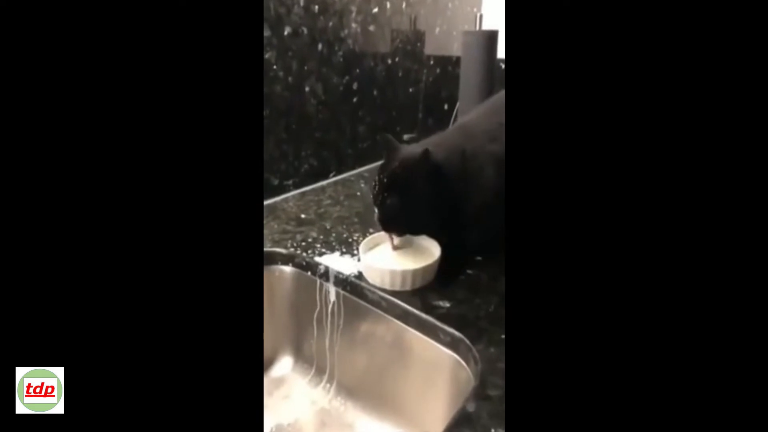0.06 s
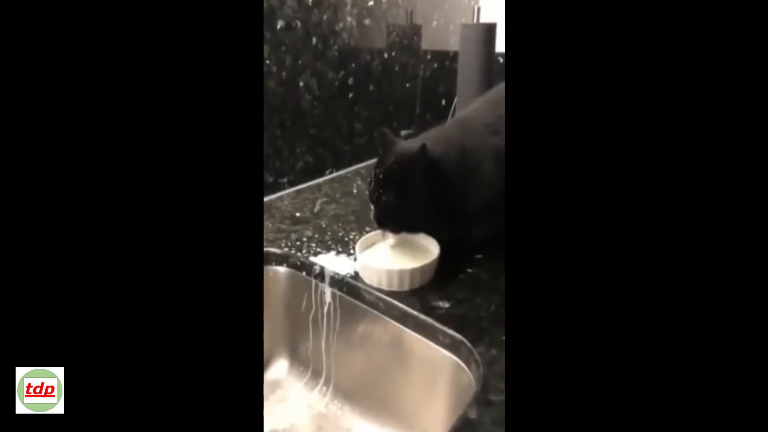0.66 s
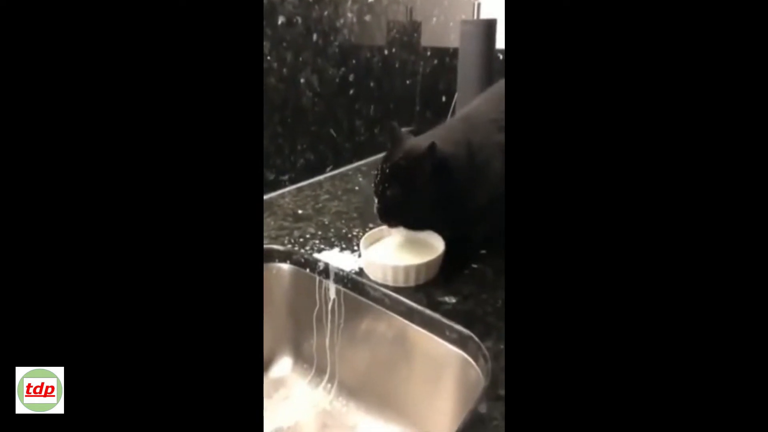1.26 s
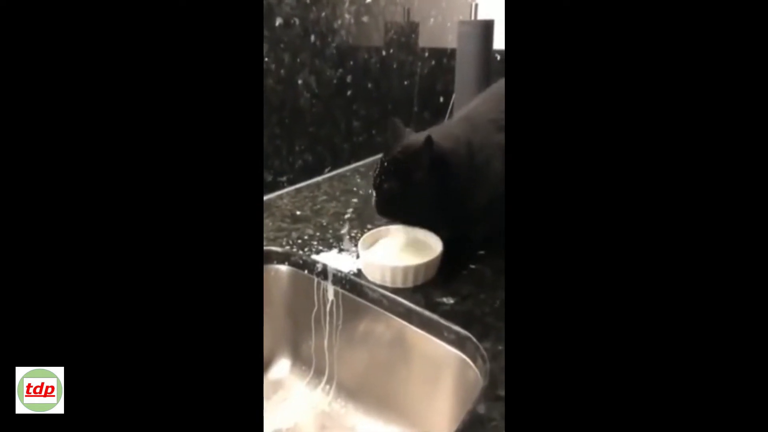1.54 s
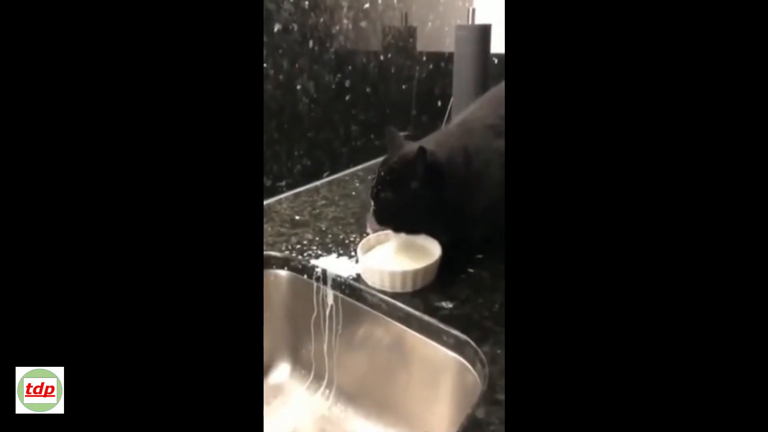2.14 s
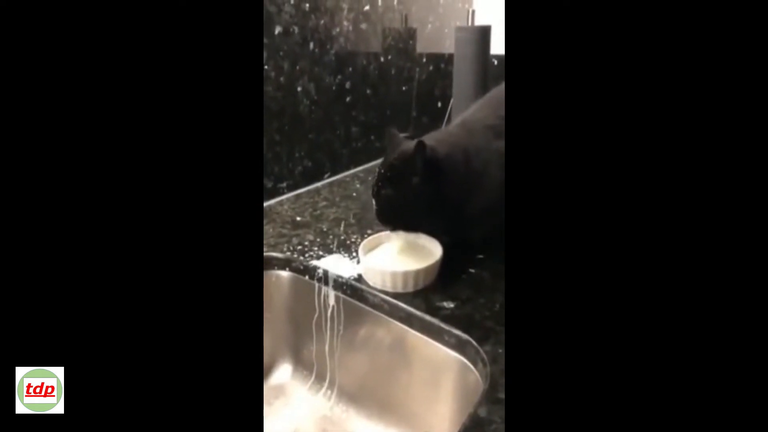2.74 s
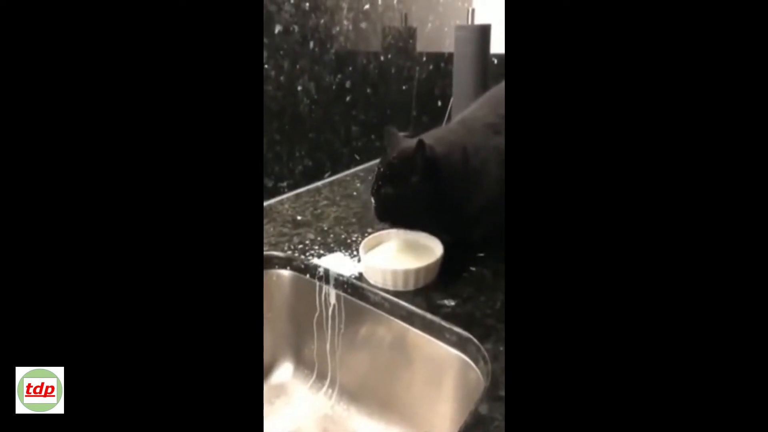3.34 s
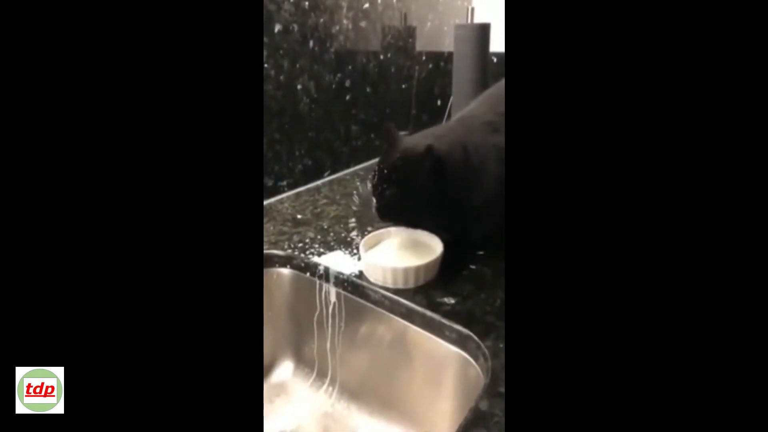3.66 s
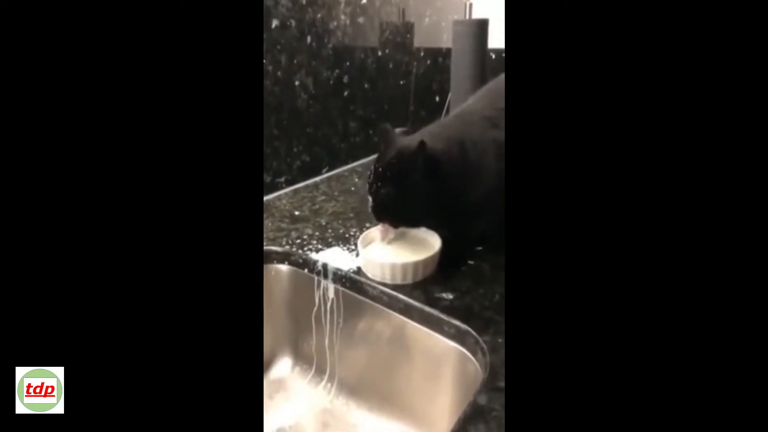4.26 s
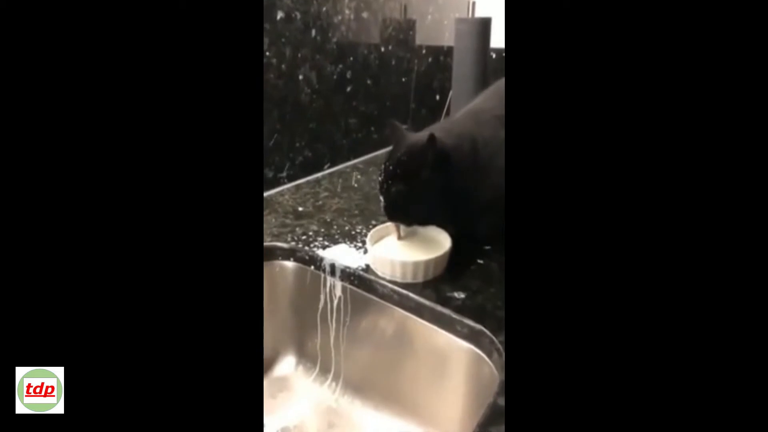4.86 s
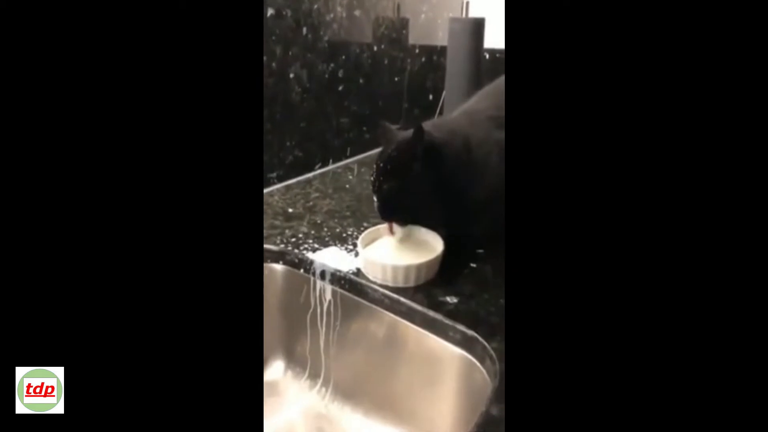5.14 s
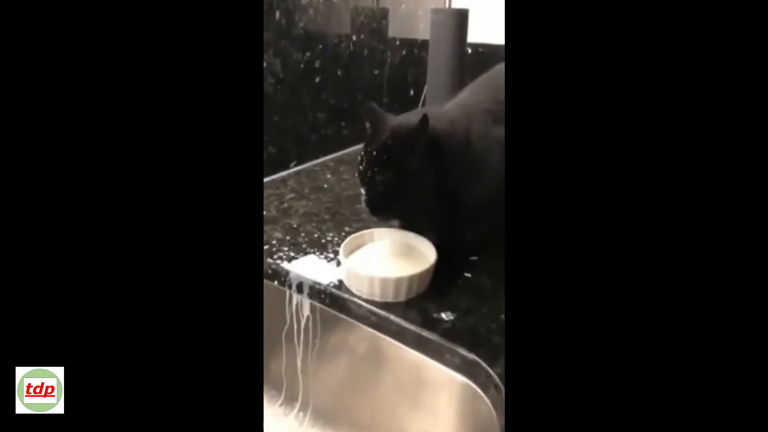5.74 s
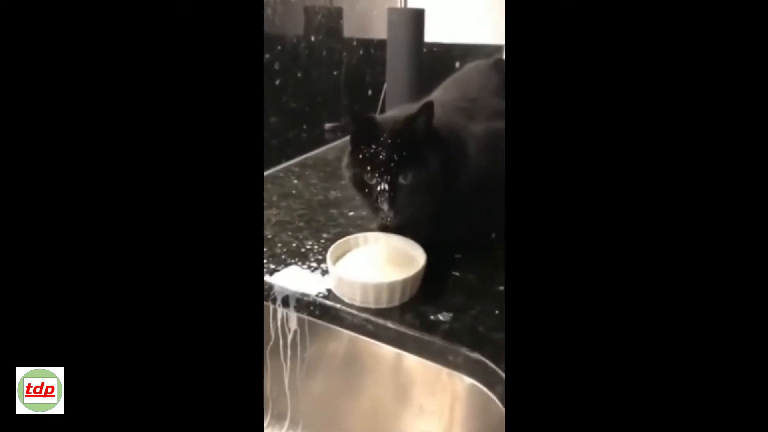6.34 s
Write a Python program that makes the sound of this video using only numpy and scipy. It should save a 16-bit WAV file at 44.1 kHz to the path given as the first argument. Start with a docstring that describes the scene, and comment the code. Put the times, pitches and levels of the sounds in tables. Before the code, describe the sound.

Close, steady lapping of a cat drinking from a bowl: soft squelches and crisp wet clicks over faint room hiss.

```python
"""A kitchen, close to the stone counter: just left of a stereo microphone, a cat laps milk from a small
ceramic bowl, about three laps a second. In every lap the wet tongue reaches out, dips and crackles;
then the mouth shuts with a gulp and a smack whose pitch rises as the cavity shrinks, until the lips
seal. Air pockets pop and saliva films snap. Bowl and kitchen ring briefly behind the direct sound;
a very low rumble and the faint hiss of room air lie underneath."""
import sys
import numpy as np
from scipy import signal
from scipy.fft import rfft, irfft, next_fast_len
from scipy.io import wavfile
from scipy.ndimage import uniform_filter1d

SR = 44100
rng = np.random.default_rng(int(sys.argv[2]) if len(sys.argv) > 2 else 0)


def wav_out(sig):
    """Save sig, one row per channel (or a flat mono array), as 16-bit PCM at SR to the path in sys.argv[1]."""
    wavfile.write(sys.argv[1], SR, np.round(np.clip(np.atleast_2d(sig).T, -1, 1) * 32767).astype(np.int16))


N = 282240
TIME = np.arange(N) / SR
GRAIN = TIME[:SR // 12]  # time within one short event
LEFT_RIGHT = np.array([[1], [-1]])  # sign of the side signal in each channel


def from_db(db):
    return 10 ** (np.asarray(db) / 20)


def rms_one(x):
    return x / np.sqrt(np.mean(x ** 2) + 1e-20)


def burst_one(x, size=132):
    """Scale a burst to rms 1 over its loudest `size` samples."""
    return x / np.sqrt(uniform_filter1d(x ** 2, size).max() + 1e-20)


def sustained(x, span_s=0.049):
    """Even out the level over a tongue stroke, leaving single grains uneven. Rms 1."""
    local_power = np.abs(uniform_filter1d(x ** 2, int(span_s * SR)))
    return rms_one(x / np.sqrt(local_power + .1 * np.mean(x ** 2)))


def add(out, s, sound):
    """Mix a sound in at time s."""
    at = int(np.clip(s * SR, 0, N - 1))
    out[at:at + len(sound)] += sound[:N - at]


def resonance(x, hz, width_hz):
    """Two-pole band-pass with gain 1 at its peak."""
    r = np.exp(-np.pi * width_hz / SR)
    feedback = [1, -2 * r * np.cos(2 * np.pi * hz / SR), r * r]
    return signal.lfilter(np.array([1, 0, -1]) * (1 - r * r) / 2, feedback, x + 1e-18)


def cut(x, hz, kind, order=2):
    """Butterworth high- or low-pass."""
    sections = signal.butter(order, min(hz, SR / 2 - 100), kind, fs=SR, output="sos")
    return signal.sosfilt(sections, x + 1e-18)


def colour(x, spectrum):
    """Minimum-phase filter through points of (frequency [Hz], gain [dB])."""
    size = next_fast_len(x.shape[-1] + len(GRAIN), True) * 2
    hz, db = np.transpose(spectrum)
    bin_hz = np.arange(size // 2 + 1) * SR / size
    log_gain = np.log(from_db(np.interp(np.log(bin_hz + 1), np.log(hz), db)))
    cepstrum = irfft(log_gain)[:size // 2]
    cepstrum[1:] *= 2
    return irfft(rfft(x, size) * np.exp(rfft(cepstrum, size)))[..., :x.shape[-1]]


def crackle(size, per_s, spread_db):
    """Random clicks of uneven strength."""
    strength = from_db(spread_db * np.minimum(rng.exponential(1, size), 4))
    return strength * rng.choice([-1, 1], size) * (rng.random(size) < per_s / SR)


# Room tone at the microphone: (frequency [Hz], gain [dB])
AIR_SPECTRUM = [(25, 10.5), (50, -13), (100, -20), (250, -27), (650, -38.5), (1400, -40), (3500, -48),
                (7000, -52), (15000, -58)]

def room_air(level_db=-55.5):
    """Still air hisses faintly all around the microphone."""
    mid, side = rng.standard_normal((2, N))
    air = colour(mid + side * LEFT_RIGHT, AIR_SPECTRUM)
    return from_db(level_db) * rms_one(cut(air, 37.5, "high"))


# Course of the rumble in the room: (time [s], level [dB])
RUMBLE_LEVELS = [(0, -36.5), (.3, -31), (.55, -51.5), (1.2, -41.5), (1.6, -36), (1.9, -47), (2.2, -32.5),
                 (4.8, -42), (5.25, -32), (5.6, -43.5)]

def rumble(hz=9.4, width_hz=3.7):
    """A slow sway below hearing, alike in both channels."""
    band = resonance(resonance(rng.standard_normal(N + SR), hz, width_hz), hz, width_hz)
    analytic = signal.hilbert(band)[SR:]
    envelope = np.abs(analytic)
    evened = analytic.real / (envelope + envelope.mean() / 2)
    level_db = np.interp(TIME, *np.transpose(RUMBLE_LEVELS))
    return from_db(level_db) * rms_one(cut(evened, 23.0, "low"))


# Licks round the lips between laps: (time [s], squelch level [dB], fizz level [dB])
LIP_LICKS = [(0.01, -54, -55.5), (0.166, -49, -52.5), (0.231, -55, -58), (0.477, -77, -62),
             (.53, -58.5, -65), (1.288, -53.5, -62), (2.02, -65, -64), (2.22, -61, -63),
             (2.647, -59.5, -61.5), (3.002, -55, -62), (3.32, -64, -60), (3.68, -65, -73),
             (4.118, -60.5, -56.5), (4.43, -56, -60), (4.78, -62.5, -65), (5.14, -55, -61),
             (5.852, -54.5, -61.5), (6.16, -64.5, -70)]
# Laps at the bowl, also played by the snaps, pops and smacks; delays count from the jaw shutting:
# (jaw shuts [s], reach gain [dB], squelch level [dB], fizz level [dB], thump level [dB],
#  cavity level [dB], spray level [dB], gulp level [dB], lip seal delay [s], lip seal level [dB],
#  film delay [s], film level [dB], film pitch [Hz])
MILK_LAPS = [(0.348, -12, -60, -55.5, -48.5, -61, -53.5, -42.5, 0.04, -44, 0.011, -42.5, 6100),
             (0.693, -6, -55, -49, -46, -54, -50, -51, 0.04, -53, 0.016, -33.5, 7900),
             (1.027, 2, -56.5, -55, -72, -54.5, -52, -54, 0.029, -41, 0.014, -36, 4370),
             (1.428, -6.5, -56.5, -51, -47.5, -50, -55, -40, 0.03, -36, 0.014, -42, 6460),
             (1.746, -2, -55.5, -55.5, -51, -54, -57.5, -48.5, 0.026, -36, 0.0094, -40, 6100),
             (2.139, -11, -54.5, -52, -41.5, -57, -57.5, -36.5, 0.041, -55.5, 0.015, -33, 4500),
             (2.455, 2.5, -55, -55.5, -47.5, -69, -48, -69, 0.024, -43.5, 0.024, -41, 6600),
             (2.842, -5, -54.5, -52.5, -41, -48.5, -53.5, -35.5, 0.032, -41, .012, -44.5, 4630),
             (3.168, -1.5, -54, -50, -48.5, -56, -53.5, -51, 0.026, -29.5, 0.02, -39, 6640),
             (3.552, -4, -53, -49, -47.5, -49, -65, -47.5, 0.046, -45.5, .013, -35.5, 5560),
             (3.884, -3, -50.5, -50, -54, -48.5, -49.5, -42.5, .027, -47.5, .02, -43, 4800),
             (4.279, 0.5, -53, -52.5, -42.5, -44.5, -48.5, -30, 0.035, -48.5, 0.017, -38, 5830),
             (4.606, 0, -49, -52, -59, -49, -45.5, -41, .031, -40, .009, -34, 5360),
             (5.003, -4, -50.5, -51, -36.5, -48, -50, -37, 0.039, -43, 0.022, -41, 7400),
             (5.328, -5, -47.5, -49.5, -48.7, -46, -48.5, -55, 0.028, -31.5, 0.0076, -40, 10700),
             (5.716, -3, -50, -48, -39.5, -49, -47, -57, 0.028, -37, 0.0055, -34, 7600),
             (6.038, 0, -49, -49.5, -43, -49.5, -49.5, -41.5, 0.028, -37.5, 0.015, -36.5, 6130),
             (6.378, -5, -53, -52.5, -44.5, -47, -56, -38.5, 0.034, -40, .0044, -43, 13700)]

def tongue_motion(reach_lead_s=0.1084, dip_lead_s=0.057, settle_lag_s=.05, rest_db=(-71, -73.5)):
    """Squelch and fizz levels in dB: the tongue licks, reaches, dips and settles over a faint wet rest."""
    moves = [(swell(s, rise_s=.02, fall_s=.028), squelch, fizz) for s, squelch, fizz in LIP_LICKS]
    for s, reach_db, squelch, fizz, *_ in MILK_LAPS:
        reach = swell(s - reach_lead_s, rise_s=0.013, fall_s=0.024)
        dip = swell(s - dip_lead_s, rise_s=0.021, fall_s=0.037)
        settle = swell(s + settle_lag_s, rise_s=0.029, fall_s=0.063)
        moves += [(reach, squelch + reach_db, fizz + reach_db),
                  (dip, squelch - 1.5, fizz - 1.5),
                  (settle, squelch - 12.5, fizz - 13.5)]
    power = from_db(rest_db)[:, None] ** 2
    for envelope, *levels_db in moves:
        power = power + (from_db(levels_db)[:, None] * envelope) ** 2
    return 10 * np.log10(power)


def swell(s, rise_s, fall_s):
    """One movement: it builds up to time s and dies away."""
    t = TIME - s
    return np.exp(np.maximum(np.where(t < 0, -(t / rise_s) ** 2, -t / fall_s), -40))


def bubbles(low_hz, high_hz, per_s, life_s, spread_db, count):
    """Wet skin peels off in uneven jerks; each bursts a run of tiny pitched bubbles. Rms 1."""
    out, t = np.zeros(N), GRAIN[:SR // 40]
    jerks_s = np.cumsum(rng.gamma(2, .5, 1500)) / per_s
    draws = rng.random((len(jerks_s), 4, count, 1))
    for s, (place, strength, delay, life) in zip(jerks_s[jerks_s < N / SR], draws):
        hz = low_hz * (high_hz / low_hz) ** place
        age = np.maximum(t - delay / per_s, 0) / (life_s * (.5 + life))
        rings = np.sin(2 * np.pi * hz * t) * np.exp(-age) * np.tanh(2 * age)
        add(out, s, np.sum(from_db(spread_db * (strength + strength[0])) * rings, axis=0))
    return rms_one(out)


# Modes of the hollow between bowl and muzzle: (frequency [Hz], width [Hz], gain [dB])
HOLLOW_MODES = [(379, 58, -9.5), (618, 132, 8.5), (837, 100, 1), (1160, 122, 8.5), (1866, 190, 2.5),
                (2250, 250, -0.5)]

def hollow(x):
    """Bowl and muzzle ring in several modes at once."""
    return sum(from_db(db) * resonance(x, hz, width) for hz, width, db in HOLLOW_MODES)


# Saliva spray from close by: (frequency [Hz], gain [dB])
SPRAY_SPECTRUM = [(1500, -7), (3300, 0.5), (4600, 3), (6200, 3), (7500, -3), (10000, -0.5), (15500, -7.5)]

def foam():
    """Saliva foam bursts in tiny pitched grains, with finer crackle riding on them. Rms 1."""
    grains = bubbles(2799, 15000, per_s=135, life_s=.0012, spread_db=7.0, count=9)
    envelope = np.sqrt(np.abs(uniform_filter1d(grains ** 2, size=200)))
    ticks = rms_one(envelope * crackle(N, per_s=14000, spread_db=-1.0))
    return rms_one(colour(grains + ticks, SPRAY_SPECTRUM))


def tongue(squelch_gain_db=-2.5, fizz_gain_db=-0.5):
    """The moving tongue rings the hollow, gurgles in the milk and bursts a little foam."""
    squelch_db, fizz_db = tongue_motion()
    gurgle = bubbles(640, 3000, per_s=170, life_s=.0026, spread_db=12.0, count=3)
    wet_clicks = crackle(N, per_s=600, spread_db=6.5)
    body = rms_one(cut(hollow(wet_clicks), 1470, "low"))
    squelch = sustained(body) + sustained(gurgle)
    froth = sustained(foam())
    brisk = np.interp(fizz_db, [-76, -58], [0, 1])  # a gentle tongue makes duller foam
    fizz = brisk * froth + (1 - brisk) * cut(froth, 6500, "low")
    return from_db(squelch_db + squelch_gain_db) * squelch + from_db(fizz_db + fizz_gain_db) * fizz


def lap_snaps(weak_count=2, weak_db=-9, span_s=0.029):
    """One main film and a few weaker ones as the mouth shuts: (time [s], pitch [Hz], level [dB])."""
    rows = []
    for s, *_, delay_s, db, hz in MILK_LAPS:
        rows.append((s + delay_s, hz, db))
        for k in range(weak_count):
            lag_s = span_s * (k + rng.random()) / weak_count
            rows.append((s + lag_s, rng.uniform(4100, 6540), db + weak_db))
    return rows


# Loud saliva films snapping on their own: (time [s], pitch [Hz], level [dB])
LONE_SNAPS = [(0.1306, 3600, -41.5), (0.2468, 7900, -47.5), (0.636, 3920, -37), (0.928, 6300, -56),
              (0.724, 4960, -46), (1.2724, 3600, -42), (1.655, 3730, -45.5), (2.0858, 4600, -41),
              (2.3533, 8900, -43.5), (2.465, 5400, -44.5), (2.7487, 5300, -45.5), (2.7859, 3600, -43.5),
              (2.8637, 6700, -41.5), (3.382, 4930, -44), (3.5195, 4500, -29.5), (3.83, 7130, -43),
              (4.0141, 6400, -47.5), (4.2447, 6400, -44), (4.283, 5300, -35.4), (4.31, 4670, -44),
              (4.5058, 4350, -44.5), (4.5347, 3900, -43), (4.5531, 6050, -34.5), (4.635, 4980, -34.5),
              (4.954, 3980, -41.5), (5.0828, 8100, -47.5), (5.2326, 14100, -45.5), (5.5382, 5270, -39),
              (5.6245, 8500, -41.5), (5.7474, 4180, -40.5), (5.861, 8440, -46), (5.939, 10500, -43),
              (5.9604, 5920, -35.5)]

def film_snaps(tear_s=.0011, decay_s=0.0023, width_hz=300, modes_db=-20.5):
    """Each film tears in a tight cluster of clicks that ring a tiny cavity and a few weaker modes."""
    out = np.zeros(N)
    envelope = np.exp(-GRAIN / decay_s) * (1 - np.exp(-GRAIN / tear_s)) ** 2
    for s, hz, db in LONE_SNAPS + lap_snaps():
        clicks = crackle(len(GRAIN), per_s=9000, spread_db=-0.5) * envelope
        ring = burst_one(resonance(clicks, hz, width_hz))
        modes = sum(resonance(clicks, mode_hz, width_hz) for mode_hz in rng.uniform(2500, 15500, size=6))
        overtones = from_db(modes_db) * burst_one(colour(modes, SPRAY_SPECTRUM))
        splash = burst_one(colour(clicks, SPRAY_SPECTRUM))
        roughness = min(hz / 6500, 1) ** 2  # larger cavities ring cleaner
        add(out, s - tear_s, from_db(db) * burst_one(ring + roughness * (overtones + splash)))
    return out


def pop(hz, ring_s=0.0028, rise_s=0.001, glide=0.037, tear_s=0.0061):
    """An air pocket opens: a short, slightly rising ring and the rough tearing of its film."""
    life_s = ring_s * (1000 / hz) ** 0.027 * from_db(rng.normal(0, 1.0))  # small pockets die sooner
    pitch = hz * (1 + glide * np.tanh(GRAIN / life_s - 1))
    envelope = np.exp(-GRAIN / life_s) * (1 - np.exp(-GRAIN / rise_s))
    ring = burst_one(np.sin(2 * np.pi * np.cumsum(pitch) / SR) * envelope)
    puff = rng.standard_normal(len(GRAIN)) * np.exp(-GRAIN / tear_s)
    tear = burst_one(cut(resonance(puff, hz, hz / 2), hz * 2.8, "low"))
    roughness = np.interp(hz, [700, 2300], [.25, .55])
    return burst_one(ring * rng.choice([-1, 1]) + roughness * tear)


def lap_pops(count=5, lead_s=.06, low_hz=635, high_hz=1450):
    """Each dip frees small pockets, then the shutting mouth pops: (time [s], pitch [Hz], level [dB])."""
    rows = []
    for s, _, squelch_db, _, _, cavity_db, _, gulp_db, seal_s, seal_db, *_ in MILK_LAPS:
        for when, place in rng.random((count, 2)):
            rows.append((s - lead_s * when, low_hz * (high_hz / low_hz) ** place, squelch_db + 4))
        # three pops, ever higher as the cavity shrinks
        gulp = (0.00305, 596, gulp_db)
        half_shut = (.019, 1930, cavity_db + 1.5)
        lip_seal = (seal_s, 2352, seal_db)
        for lag_s, hz, db in gulp, half_shut, lip_seal:
            rows.append((s + lag_s, hz * rng.uniform(.92, 1.08), db))
    return rows


# Loudest single pops, on the tongue and at the parting lips between laps: (time [s], pitch [Hz], level [dB])
LOUD_POPS = [(0.1395, 3800, -41), (0.2467, 2520, -48.5), (0.2921, 670, -44.5), (0.3512, 1170, -39.5),
             (0.523, 2580, -47.5), (0.6359, 724, -38), (0.6553, 1005, -44.5), (0.6944, 487, -42),
             (0.9406, 810, -37), (1.2794, 2450, -42.5), (1.647, 2620, -40.5), (1.656, 893, -38),
             (1.759, 2420, -39), (2.0822, 1350, -46), (2.422, 745, -43.5), (2.4672, 1764, -35.5),
             (2.468, 1400, -42), (2.7852, 603, -45.5), (2.8045, 1380, -39), (2.8143, 2210, -38.5),
             (3.07, 3260, -41), (3.125, 1234, -42.5), (3.1616, 1540, -39.5), (3.1858, 1920, -32.5),
             (3.2757, 2390, -41.5), (3.381, 2330, -47), (3.5049, 1200, -39.5), (3.5549, 770, -38.5),
             (3.5205, 1200, -40), (3.912, 3170, -41), (4.1692, 1000, -43.5), (4.2482, 1000, -39),
             (4.2953, 2280, -41), (4.4987, 640, -43.5), (4.5587, 560, -38), (4.5724, 1010, -45),
             (4.5834, 880, -42), (4.89, 990, -46), (4.9489, 1025, -37.5), (5.0281, 1770, -37),
             (5.2673, 945, -45.5), (5.3035, 910, -41.5), (5.537, 1026, -34.5), (5.5368, 1960, -34),
             (5.6596, 880, -36.5), (5.674, 1660, -39), (5.9566, 917, -31), (6.0167, 610, -43.5),
             (6.3259, 710, -42)]

def pocket_pops():
    """Air pockets pop on the tongue and in the mouth, and the lips pop as they part."""
    out = np.zeros(N)
    for s, hz, db in LOUD_POPS + lap_pops():
        add(out, s, from_db(db) * pop(hz))
    return out


# Soft thump of the shutting mouth: (frequency [Hz], gain [dB])
THUMP_SPECTRUM = [(50, -4.5), (110, -7), (200, 0), (265, -3), (365, 3.5), (470, -8.5), (600, -15.5),
                  (1000, -11), (3000, -27)]

def smacks(open_hz=560, shut_hz=2550, close_s=0.033, width_hz=340, thump_s=0.009,
           cavity_gain_db=2.0, spray_gain_db=4.5):
    """The jaw shuts: a soft thump, then crackle through a shrinking cavity, and a spray of foam."""
    out, size, froth = np.zeros(N), len(GRAIN), foam()
    closing = np.clip(GRAIN / close_s, 0, 1)
    squeeze = (1 - np.exp(-GRAIN / 0.0054)) / (1 + (GRAIN / close_s) ** 7)
    pole = np.exp(-np.pi * width_hz / SR)
    for k, (s, _, _, _, thump_db, cavity_db, spray_db, *_) in enumerate(MILK_LAPS):
        push = rng.standard_normal(size) * np.exp(-GRAIN / thump_s)
        thump = from_db(thump_db) * burst_one(colour(push, THUMP_SPECTRUM), size=300)
        end_hz = shut_hz * from_db(rng.normal(0, 0.7))  # no two laps close alike
        pitch = open_hz * (end_hz / open_hz) ** closing
        # each click rings at the cavity's pitch of the moment
        phasor = np.exp(2j * np.pi * np.cumsum(pitch) / SR)
        clicks = crackle(size, per_s=1300, spread_db=2.0)
        rings = np.imag(signal.lfilter([1], [1, -pole], clicks / phasor) * phasor)
        slurp = from_db(cavity_db + cavity_gain_db) * rms_one(rings)
        spray = from_db(spray_db + spray_gain_db) * rms_one(froth[k * size:(k + 1) * size])
        add(out, s, thump + squeeze * (slurp + spray))
    return out


# Thuds of jaw and throat: (time [s], level [dB])
THROAT_THUDS = [(0.801, -56.5), (2.779, -53), (3.268, -60.5), (4.167, -52), (4.935, -54.5)]

def thuds(hz=165, width_hz=105, swell_s=0.0025):
    """Jaw and throat give dull, soft pulses."""
    out = np.zeros(N)
    for s, db in THROAT_THUDS:
        push = rng.standard_normal(len(GRAIN)) * GRAIN * np.exp(-GRAIN / swell_s)
        pulse = cut(resonance(push, hz, width_hz), 2 * hz, "low")
        add(out, s, from_db(db) * burst_one(pulse, size=400))
    return out


# The kitchen's tail at the microphone: (frequency [Hz], gain [dB])
TAIL_SPECTRUM = [(150, 8), (700, -1.5), (2300, -3), (15000, -3)]

def kitchen(x, early_db=-9.5, early_t60_s=0.061, tail_db=-23.0, tail_t60_s=0.45,
            near_db=-12.5, near_s=0.00016):
    """Counter, sink and wall send quick reflections to the microphone, then a faint tail."""
    t = TIME[:SR // 2]
    early, tail = rng.standard_normal((2, 2, len(t)))  # each has a mid and a side row
    early = early * from_db(-60 * t / early_t60_s) * (t > .0015)
    tail = colour(tail, TAIL_SPECTRUM) * from_db(-60 * t / tail_t60_s) * (1 - np.exp(-t / 0.0085))
    response = from_db(early_db) * rms_one(early) + from_db(tail_db) * rms_one(tail)
    # the nearest surfaces make left and right differ
    near = rng.standard_normal(len(t)) * t * np.exp(-t / near_s)
    response[1] += from_db(near_db) * rms_one(near)
    mid, side = signal.fftconvolve(x[None], response / np.sqrt(len(t)), axes=1)[:, :N]
    return mid + side * LEFT_RIGHT / np.sqrt(2)


def scene(left_db=1.5, mouth_db=-0.5, bowl_db=-10):
    """The cat sits close to the microphone, a little left of centre, its mouth just over the bowl."""
    mouth = from_db(mouth_db) * (pocket_pops() + film_snaps() + smacks())
    bowl = from_db(bowl_db) * hollow(mouth)
    cat = mouth + bowl + tongue() + thuds()
    lows = cut(cat, 4100, "low", order=1)  # these lean left; the top stays centred
    direct = cat + (from_db(LEFT_RIGHT * left_db / 2) - 1) * lows
    return direct + kitchen(cat) + room_air() + rumble()


def record(dry, cutoff_hz=16000):
    """The top of the microphone's signal is cut steeply."""
    return signal.sosfilt(signal.ellip(10, .1, 70, cutoff_hz, fs=SR, output="sos"), dry)


dry = scene()
out = record(dry)
wav_out(out)
```